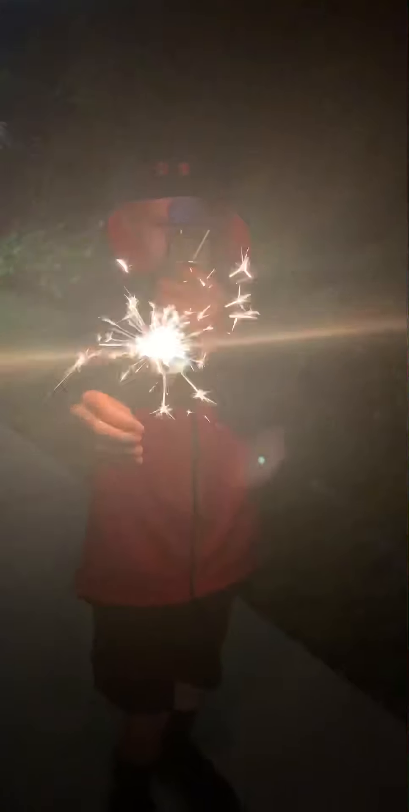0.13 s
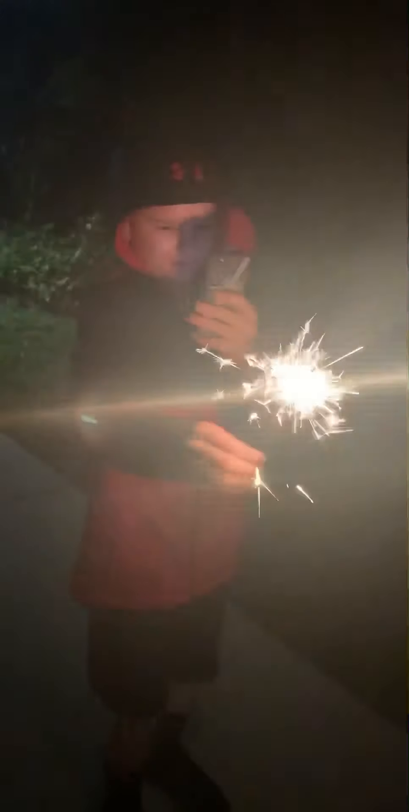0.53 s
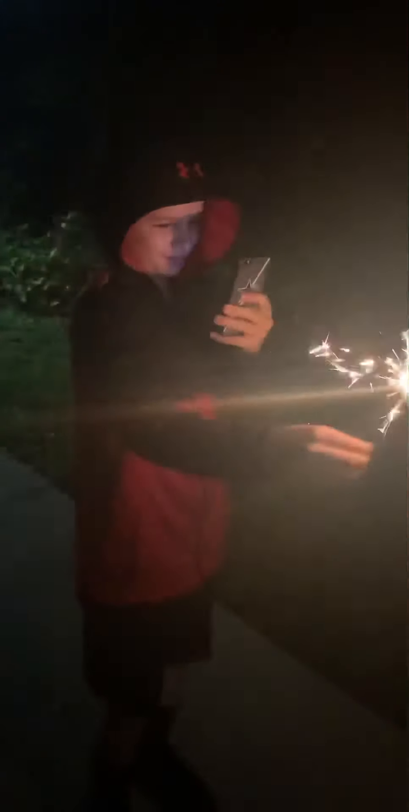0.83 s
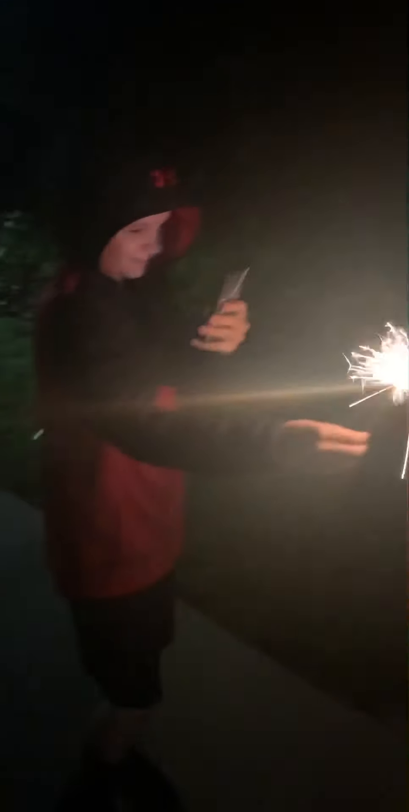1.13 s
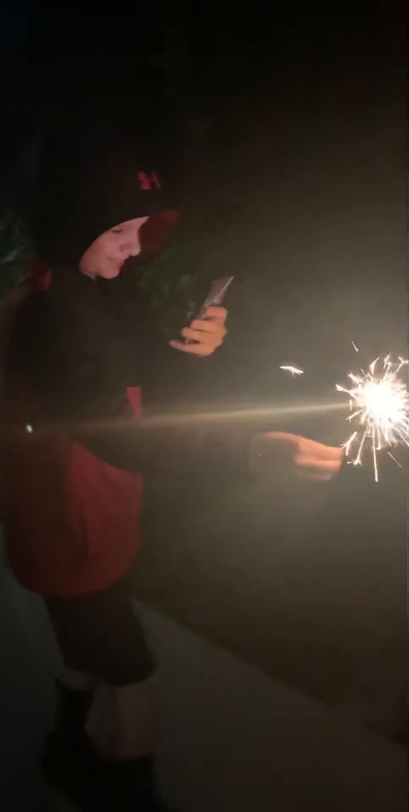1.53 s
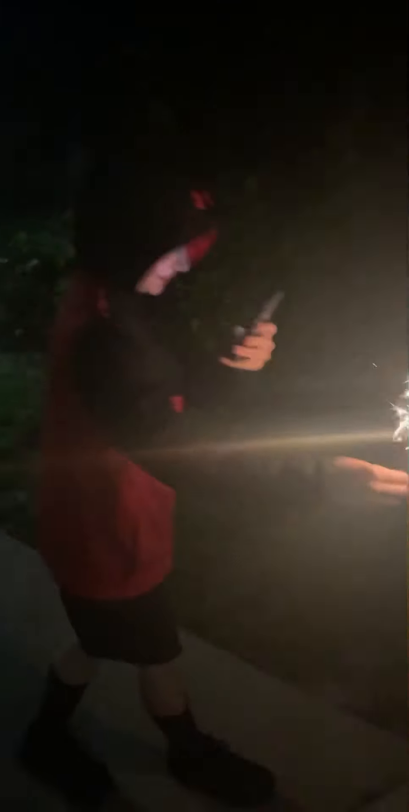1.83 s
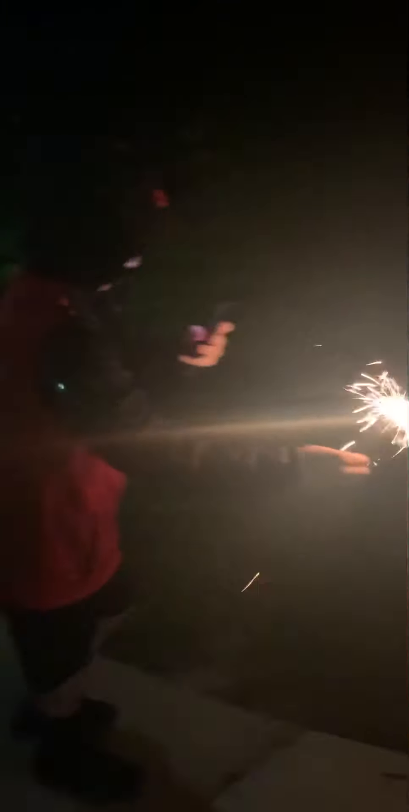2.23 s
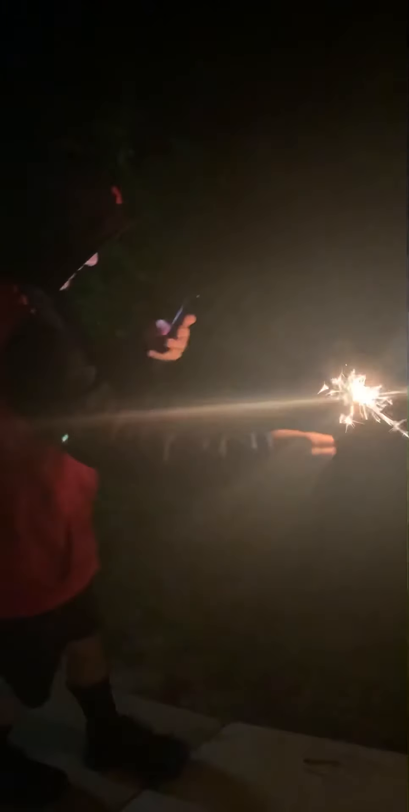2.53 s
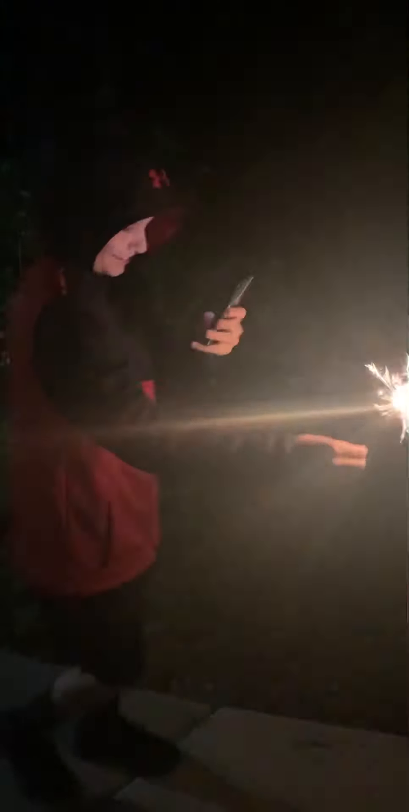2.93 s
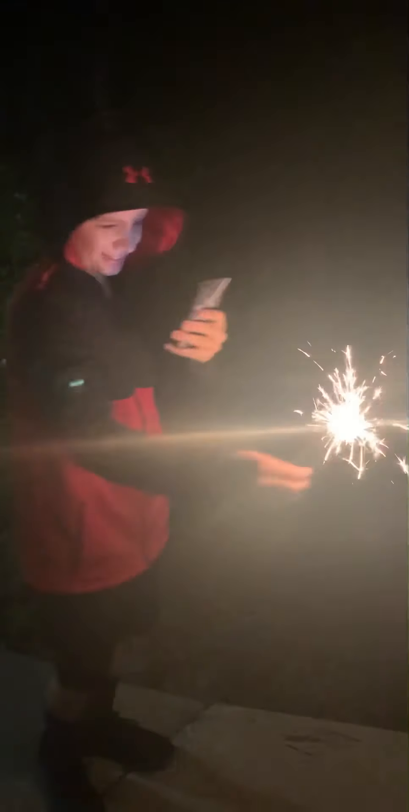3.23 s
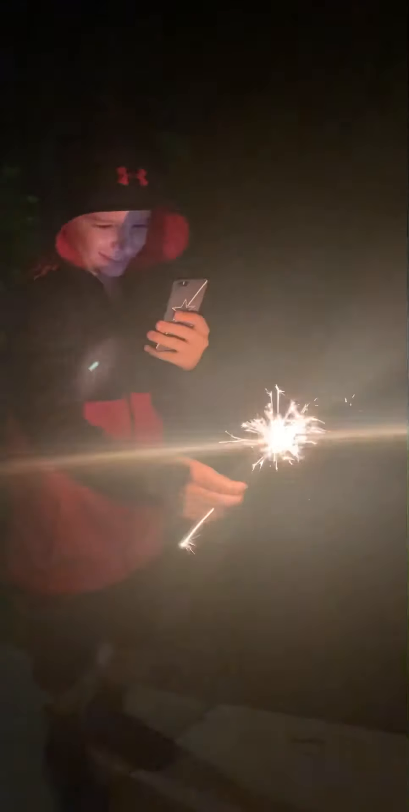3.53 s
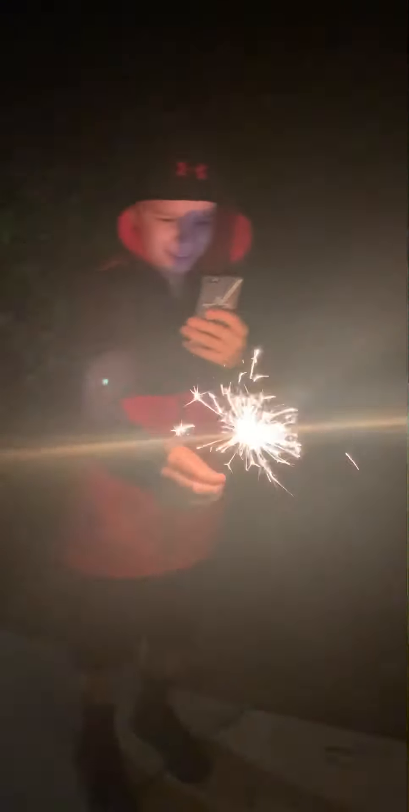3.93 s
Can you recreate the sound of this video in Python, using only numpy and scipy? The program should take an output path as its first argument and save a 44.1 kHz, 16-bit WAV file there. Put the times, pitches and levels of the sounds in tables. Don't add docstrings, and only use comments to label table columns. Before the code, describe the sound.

A steady bright fizz made of dense tiny cracks, with larger snaps above it, starts near, retreats and returns by the end. Far traffic and a faint steady hum fill the quiet night behind. Fingers thump the phone dully several times in the second half, a few insect chirps pass, a lump of fuel spits, and a tiny hard knock closes the stretch, captured by a handheld stereo phone.

```python
import sys
import numpy as np
from scipy import signal
from scipy.fft import rfft, irfft, next_fast_len
from scipy.io import wavfile
from scipy.ndimage import uniform_filter1d

SR = 44100
rng = np.random.default_rng(int(sys.argv[2]) if len(sys.argv) > 2 else 0)


def level_to_linear(level):
    exponent = np.asarray(level, float) / 20
    return 10 ** exponent


def inscribe(sig):
    pcm = np.round(np.clip(np.atleast_2d(sig).T, -1, 1) * 32767)
    wavfile.write(sys.argv[1], SR, pcm.astype(np.int16))


N = 180369


def rms_one(x):
    return x / np.sqrt(np.mean(x ** 2) + 1e-20)


def in_time(rows):
    s, *columns = np.transpose(rows)
    return [np.interp(np.arange(N) / SR, s, c) for c in columns]


def at_hz(points, hz):
    table_hz, values = np.array(points).T
    return np.interp(np.log(hz + 1), np.log(table_hz), values)


def shaped(x, gain):
    size = next_fast_len(N + 4096)
    hz = np.arange(size // 2 + 1) * SR / size
    return irfft(rfft(x, size) * gain(hz), size)[..., :N]


def band(x, low_hz, high_hz):
    return signal.sosfilt(signal.butter(2, [low_hz, high_hz], "band", fs=SR, output="sos"), x)


def drift(rate_hz):
    r = np.exp(-80 * np.pi * rate_hz / SR)
    noise = rng.standard_normal(N // 40 + 2002)
    slow = signal.lfilter([1], [1, -2 * r, r * r], noise)[2000:]
    return np.interp(np.arange(N) / 40, np.arange(len(slow)), rms_one(slow))


def ring(x, hz, width_hz):
    r, w = np.exp(-np.pi * width_hz / SR), 2 * np.pi * hz / SR
    return signal.lfilter([0, np.sin(w)], [1, -2 * r * np.cos(w), r * r], x + 1e-18)


def clicks(times, sizes):
    out = np.zeros(N)
    out[(np.asarray(times) * SR).astype(int)] = sizes
    return out


def burn():
    # start_s, sizzle_db
    swing = [(0.0, -49.5), (0.44, -51), (0.7, -53), (1.02, -59), (1.15, -55.5), (1.45, -53), (1.62, -57),
             (1.9, -55.5), (2.14, -60), (2.36, -59.5), (2.5, -61), (2.74, -62.5), (3.0, -53), (3.4, -53),
             (3.62, -50.5), (3.8, -54), (4.09, -49.5)]
    # peak_s, rise_db
    rich_patches = [(0.0, 2.5), (0.21, 3), (0.36, 1.5), (0.58, 4.5), (1.091, 3), (1.309, 3.5), (1.85, 2),
                    (1.982, 5.5), (2.29, 3.5), (2.42, 6), (2.631, 4), (2.81, 2.5), (3.091, 4), (3.308, 3.5),
                    (3.709, 4.5), (3.83, 4), (3.98, 2)]
    rise_s, fall_s = .046, .047
    t, surge_db = np.arange(N) / SR, 0
    for s, db in rich_patches:
        pace_s = np.where(t < s, rise_s, fall_s)
        surge_db = surge_db + db * np.exp(-((t - s) / pace_s) ** 2)
    return in_time(swing)[0], surge_db


def sparkler():
    # pitch_hz, level_db (per Hz)
    fizz_tone = [(480, 0.5), (800, 2), (1300, 3), (2100, 0.65), (3000, -3), (4500, -1.34), (7000, -1.5),
                 (8500, 2), (10500, 1), (13000, -1.3), (15800, -1.5)]
    sparks_per_s, spread_db, biggest = 4000., 3.5, 4.0
    hiss_share, flutter_db = .55, 1.24
    near_db, surge_db = burn()
    swing_db = near_db + 55
    registers = (near_db + surge_db,
                 -59.5 + 0.84 * swing_db + 0.96 * surge_db,
                 -60.5 + 0.55 * swing_db + 0.75 * surge_db)
    sizzle_db, body_db, roar_db = (db + 1.02 * drift(15.0) for db in registers)
    sizes = level_to_linear(spread_db * np.minimum(rng.exponential(1, N), biggest)) * rng.choice([-1, 1], N)
    cracks = rms_one(sizes * (rng.random(N) < sparks_per_s / SR))
    fire = np.sqrt(1 - hiss_share) * cracks + np.sqrt(hiss_share) * rng.standard_normal(N)
    flutter = level_to_linear(flutter_db * drift(12.0) + .9 * drift(85.0))
    fire = shaped(fire * flutter, lambda hz: level_to_linear(at_hz(fizz_tone, hz)))
    sizzle = shaped(fire, lambda hz: 1 / (1 + (8000 / (hz + 1)) ** 6))
    roar = shaped(fire, lambda hz: 1 / (1 + (hz / 2800) ** 6))
    body = fire - sizzle - roar
    return level_to_linear(sizzle_db + 5.0) * sizzle + level_to_linear(body_db + 7.5) * body + level_to_linear(roar_db + 9.5) * roar


def night():
    # pitch_hz, level_db (per Hz)
    rumble_tone = [(15, -27), (25, -14), (60, 1.5), (86, 0.5), (189, -5), (238, -9.5), (293, -8),
                   (362, -12), (405, -16.5), (670, -17.5), (775, -17.5), (1110, -36.5), (1200, -26.5),
                   (1560, -31), (2640, -120)]
    # closest_s, rise_db, half_length_s
    vehicles = [
        (0.11, 10, 0.034),
        (1.967, 14.5, 0.25),
        (4.007, 16.5, 0.16),
    ]
    drone_hz, width_hz = 398.5, 68
    t = np.arange(N) / SR
    rumble_db = -52.5 + 0.98 * t + 0.75 * drift(3.0)
    drone_db = -66.5 + 2.5 * drift(2.74)
    for s, db, half_s in vehicles:
        drone_db = drone_db + db / (1 + ((t - s) / half_s) ** 2)
    rumble = rms_one(shaped(rng.standard_normal(N), lambda hz: level_to_linear(at_hz(rumble_tone, hz))))
    drone = rms_one(band(rng.standard_normal(N), drone_hz - width_hz / 2, drone_hz + width_hz / 2))
    return level_to_linear(rumble_db) * rumble + level_to_linear(drone_db - 2) * drone


def fan_hum():
    # pitch_hz, width_hz, level_db, waver_db
    fan_tones = [
        (87.1, 2.51, -56, 3.5),
        (239.1, 0.37, -53.5, 0.8),
        (358.4, 2.51, -66, 1.5),
    ]
    out = 0
    for hz, width_hz, db, waver_db in fan_tones:
        phase = 2 * np.pi * np.cumsum(hz + width_hz * drift(2.91)) / SR
        out = out + level_to_linear(db + 1.5 + waver_db * drift(3.0)) * np.sin(phase)
    return out


def insect():
    # peak_s, level_db
    chirps = [
        (1.838, -57),
        (1.883, -49.5),
        (1.969, -52),
        (2.063, -51),
        (2.113, -57),
        (2.199, -55.5),
    ]
    chirp_hz, chirp_s = 2120, 0.0049
    t = np.arange(N) / SR
    bells = sum(level_to_linear(db) * np.exp(-((t - s) / chirp_s) ** 2) for s, db in chirps)
    chorus = rms_one(ring(rng.standard_normal(N), chirp_hz, 120))
    return bells * np.sin(2 * np.pi * chirp_hz * t) + chorus * level_to_linear(-75 + 3.0 * drift(8.))


def pops():
    # start_s, peak_db, low_part_db (against the peak)
    big_sparks = [(0.0402, -31, -3.5), (0.0745, -31, -4), (0.085, -28.5, -19), (0.2166, -28, -14),
                  (0.3476, -46, -15), (0.5493, -26, -10), (0.619, -25, -10), (0.7022, -35, -19),
                  (0.72, -33, -8), (0.7387, -31.5, -7), (0.8193, -27, -14), (0.9839, -33, -29),
                  (1.0969, -33, -15), (1.105, -27.5, -24), (1.3273, -32.5, -13), (1.4184, -36, -13),
                  (1.5617, -39, -16), (1.646, -34, -27), (1.7405, -34, -12), (1.8704, -34, -22),
                  (1.9596, -30.5, -10), (2.0678, -37.5, -25), (2.282, -33, -6), (2.3992, -30.5, -32),
                  (2.6277, -33, -21), (2.7139, -40, -20), (3.0754, -36, -19), (3.3038, -36, -9),
                  (3.7973, -23, -20), (3.854, -27, -9)]
    lesser_count = 56
    when = rng.uniform(0, N / SR, lesser_count)
    luck = rng.standard_normal((lesser_count, 2))
    sizzle_db = sum(burn())[(when * SR).astype(int)]
    lesser_db = sizzle_db + 16.5 + 4 * luck[:, 0]
    lesser = np.transpose([when, lesser_db, -19.5 + 5.5 * luck[:, 1]])
    s, peak_db, low_db = np.transpose(np.vstack([big_sparks, lesser]))
    sign = rng.choice([-1, 1], len(s))
    fading = signal.lfilter([1], [1, -.95], clicks(s, level_to_linear(peak_db - 12.5)))
    grit = fading * rng.standard_normal(N)
    crack = band(clicks(s, sign * level_to_linear(peak_db + 4.5)) + grit, 3500, 19000)
    weight = band(clicks(s, sign * level_to_linear(peak_db + low_db + 17.5)), 820, 3000)
    return crack + weight


def taps():
    # start_s, thump_db, body_hz, nail_tick_db
    finger_taps = [
        (1.673, -38, 290, -21),
        (2.049, -37, 340, -19),
        (2.374, -37, 390, -19),
        (2.402, -38, 430, -18.5),
        (3.238, -36, 270, -42),
        (3.259, -37, 430, -21),
        (3.443, -36, 280, -18),
    ]
    out = 0
    for s, db, hz, tick_db in finger_taps:
        out = out + level_to_linear(db) * ring(clicks([s + 0.0015], 1), hz, 115.)
        nail = band(band(clicks([s], 1), 600, 2900), 600, 2900)
        out = out + level_to_linear(tick_db) * nail
    return out * np.array([[1], [-1]])


def spit():
    # level_db, rise_s, hold_s, fall_s, pitch_hz, width_hz
    flare = (-40, 0.004, .021, 0.013, 4600, 3000)
    db, rise, hold, fall, hz, width_hz = flare
    t = np.arange(N) / SR - 3.025
    swell = np.clip(t / rise, 0, 1) * np.exp(-np.maximum(t - rise - hold, 0) / fall)
    rough = rng.standard_normal(N) * level_to_linear(1.5 * drift(300.))
    burst = rms_one(band(rough, hz - width_hz / 3, hz + 1.7 * width_hz))
    hollow = level_to_linear(-6.0) * rms_one(ring(rough[::-1], 3800.0, 500.))
    height = np.exp(-((t - 0.022) / .005) ** 2)
    whistle = level_to_linear(-1.0) * rms_one(ring(rough, 5100.0, 300.)) * height
    return level_to_linear(db) * (swell * (burst + hollow) + whistle)


def tick():
    # level_db, contact_s
    knock = (-41.5, 0.0023)
    contacts = [
        4.0055,
        4.010,
    ]
    # pitch_hz, level_db, fade_s (to fall 60 dB)
    knock_tones = [
        (1720, 0, 0.033),
        (2040, 1, 0.036),
        (2156, 3.5, 0.045),
    ]
    db, contact_s = knock
    out = 0
    for s in contacts:
        rings = sum(level_to_linear(level_db) * ring(clicks([s], 0.93), hz, 2.3 / fade_s)
                    for hz, level_db, fade_s in knock_tones)
        out = out + rings * np.clip((np.arange(N) / SR - s) / contact_s, 0, 1)
    return level_to_linear(db) * out


def ports(air, other_air):
    # pitch_hz, lead_radians
    port_turn = [(20, -0.2), (300, 0.22), (800, 0.58), (1400, -0.23), (2600, 0.6), (3100, -1.8), (3600, -2),
                 (4000, -2)]
    # pitch_hz, level_db
    unshared = [(40, -27), (150, -22), (400, -9), (800, -3.5), (1500, -15), (2500, -13.5), (3000, -4.5),
                (4000, -14.5), (15900, -13)]
    # pitch_hz, difference_db
    left_lift = [(60, -0.3), (200, 2.5), (400, 3), (850, -1.1), (2500, -2.5), (3900, 0)]

    def turn(hz):
        late = 3.6 - 2 * np.pi * hz * 10.3 / SR
        return np.exp(1j * np.where(hz > port_turn[-1][0], late, at_hz(port_turn, hz)))

    diffuse = shaped(other_air, lambda hz: level_to_linear(at_hz(unshared, hz)))
    left = shaped(air + diffuse, lambda hz: level_to_linear(at_hz(left_lift, hz) / 2))
    right = shaped(air - diffuse, lambda hz: turn(hz) * level_to_linear(-at_hz(left_lift, hz) / 2))
    return np.array([left, right])


def scene():
    air = sparkler() + night()
    other_air = sparkler() + night()
    return ports(air + fan_hum() + pops() + spit() + tick() + insect(), other_air) + taps()


def handled(dry):
    # start_s, end_s, share (0-1)
    touches = [
        (1.661, 1.708, 0.9),
        (2.037, 2.071, 0.9),
        (2.351, 2.431, 0.79),
        (3.237, 3.283, 0.58),
        (3.318, 3.474, 0.69),
    ]
    # low_hz, high_hz
    middle_hz = (413, 2100)
    t, moved = np.arange(N) / SR, np.zeros(N)
    for start, end, share in touches:
        moved += share * ((t > start) & (t < end))
    moved = uniform_filter1d(moved, size=400)
    low_hz, high_hz = middle_hz
    middle = shaped(dry.mean(axis=0),
                    lambda hz: 1 / (1 + (low_hz / (hz + 1)) ** 8) / (1 + (hz / high_hz) ** 8))
    return dry - moved * middle + np.sqrt(np.abs(moved)) * middle * [[1], [-1]]


def thinned(pair):
    thin_edges = [64, 72, 80, 88, 96, 108, 120, 132, 144, 160, 176, 196, 216, 240, 264, 292, *range(320, 737, 32)]
    sharp_cracks = [
        .818,
        2.045,
        3.797,
    ]
    bass_under_db, treble_under_db, waver_db = -12.5, -5.3, 1.97
    frame = 1024
    grid = dict(window="cosine", nperseg=2 * frame, noverlap=frame)
    sum_and_difference = np.array([pair[0] + pair[1], pair[0] - pair[1]]) / 2
    _, s, both = signal.stft(sum_and_difference, SR, **grid)
    whole = np.min(np.abs(s[:, None] - sharp_cracks), axis=1) < .6 * frame / SR
    keep = np.ones(both.shape)
    for low, high in zip(thin_edges, thin_edges[1:]):
        level = np.sqrt(np.sum(np.abs(both[:, low:high]) ** 2, axis=1))
        under_db = treble_under_db if low > 130 else bass_under_db
        under = level_to_linear(under_db + waver_db * rng.uniform(-1.1, 1, len(s)))
        keep[:, low:high] = ((level > under * level[::-1]) | whole)[:, None]
    keep[:, 733:] = 0
    _, (mid, side) = signal.istft(both * keep, SR, **grid)
    return np.array([mid + side, mid - side])[:, :N]


def top_cut(x):
    return signal.sosfilt(signal.butter(12, 16990, fs=SR, output="sos"), x)


def record(dry):
    mix = shaped(thinned(handled(dry)), lambda hz: 1 / (1 + (31.0 / (hz + 1)) ** 6))
    return top_cut(mix)


dry = scene()
out = record(dry)
inscribe(out)
```